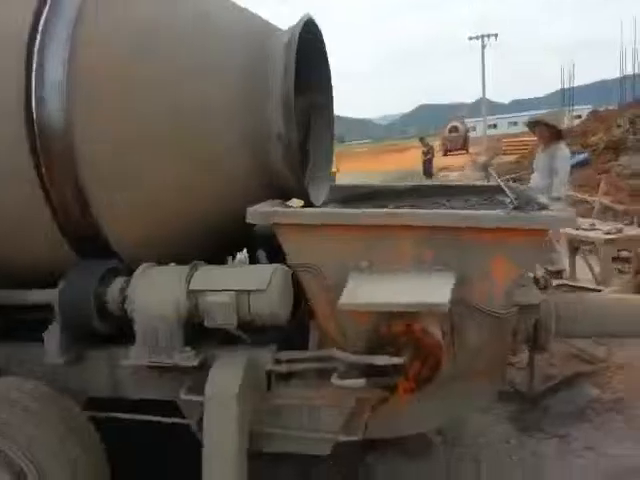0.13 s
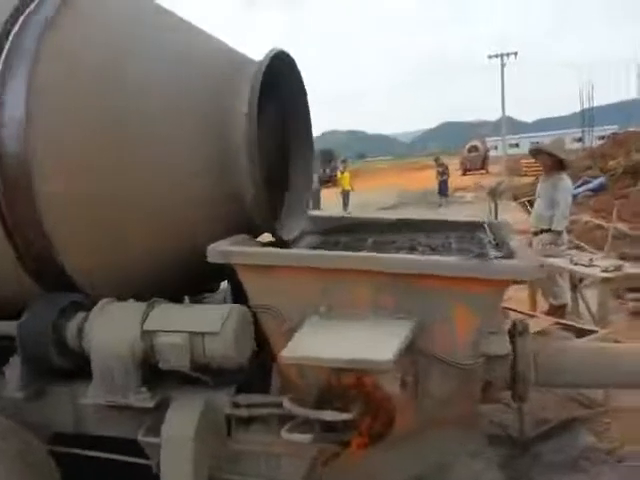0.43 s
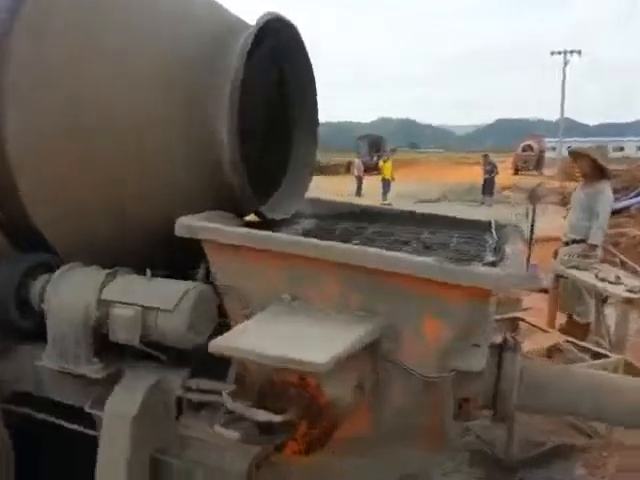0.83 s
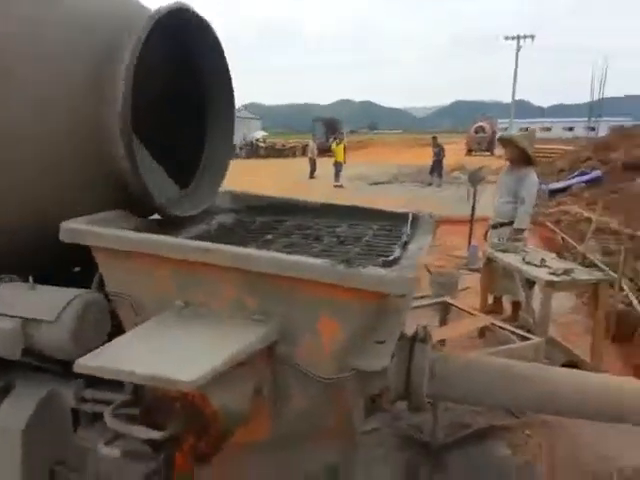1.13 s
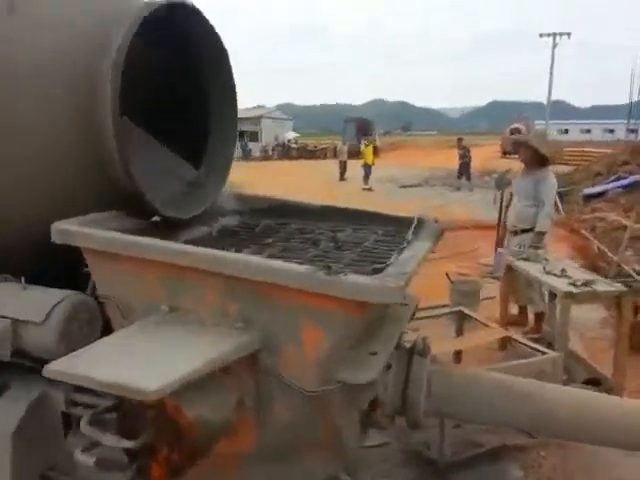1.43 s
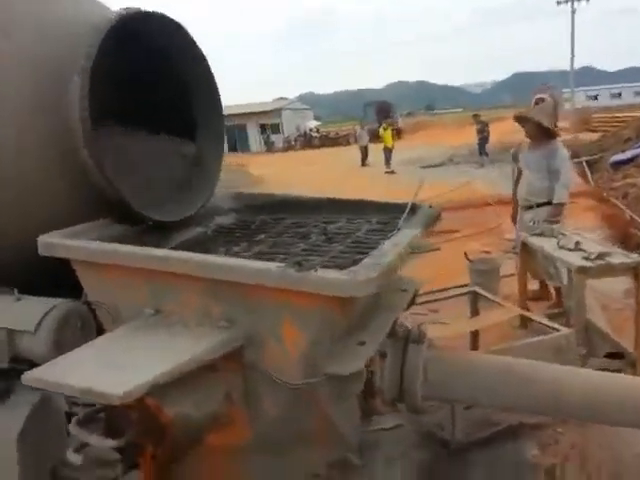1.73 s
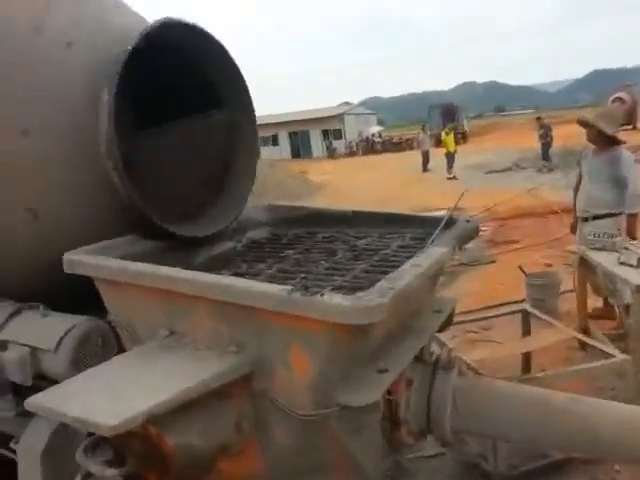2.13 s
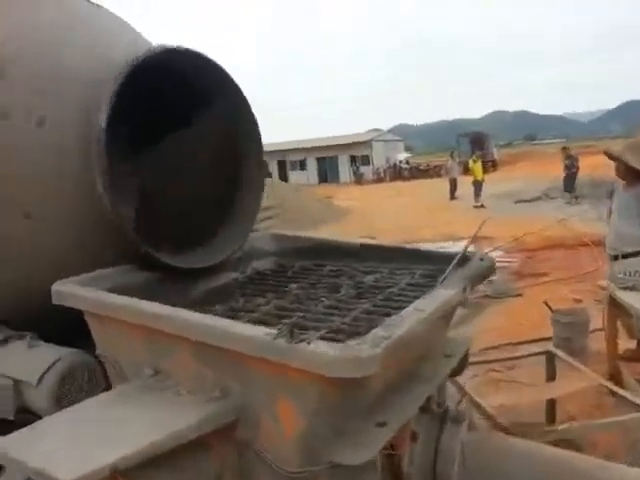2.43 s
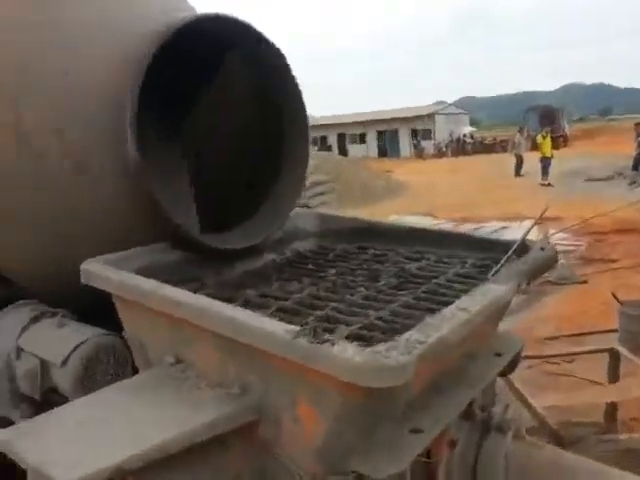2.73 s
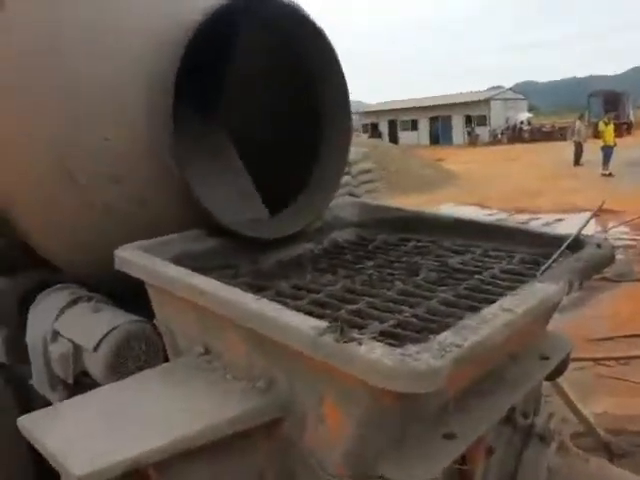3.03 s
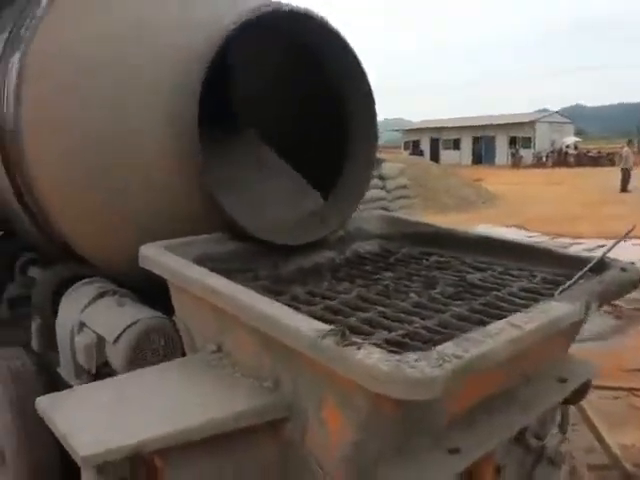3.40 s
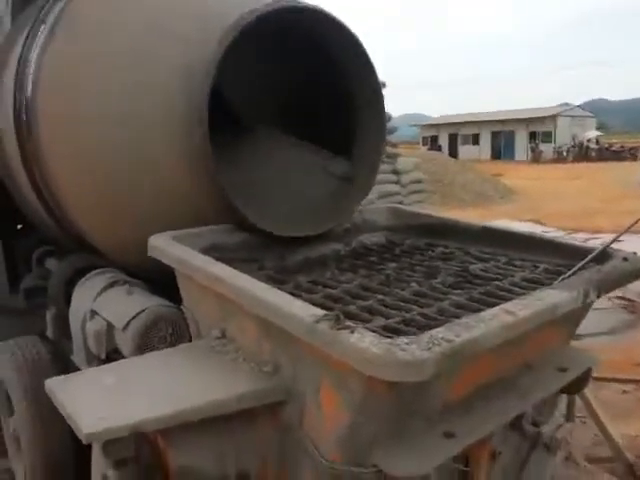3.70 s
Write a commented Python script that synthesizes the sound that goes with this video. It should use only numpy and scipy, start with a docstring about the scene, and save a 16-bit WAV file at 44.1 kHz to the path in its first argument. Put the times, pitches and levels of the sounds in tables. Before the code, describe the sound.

A concrete mixer and pump run with a rattling roar, gravel hiss and gear whine.

```python
"""A rattling roar, a hiss and a whine start at once: a concrete mixer and pump running outdoors.
Steel parts shake to make the roar, wet gravel hisses in the turning drum, a gear whines, a shaft hums.
As the microphone moves toward the hopper, a low drone grows. Then the mix is heard churning there,
scraping the steel walls and dropping in lumps."""
import sys
import numpy as np
from scipy import signal
from scipy.fft import rfft, irfft
from scipy.io import wavfile
from scipy.ndimage import uniform_filter1d

SR = 44100
rng = np.random.default_rng(int(sys.argv[2]) if len(sys.argv) > 2 else 0)


def pcm_store(signal):
    """Save signal as 16-bit PCM."""
    levels = np.round(np.clip(np.atleast_2d(signal), -1, 1) * 32767)
    wavfile.write(sys.argv[1], SR, levels.astype(np.int16).T)


N = 170226


def undb(db):
    """Turn decibels into a number to multiply a sound by."""
    return 10 ** (np.asarray(db) / 20)


def unit(x):
    """Scale a signal so that its typical swing is 1."""
    return x / np.std(x)


def curve(rows):
    """A volume that glides through (time_s, level_db) points."""
    return undb(np.interp(np.arange(N) / SR, *np.array(rows).T))


def bump(middle_s, half_width_s):
    """A smooth rise and fall around one moment."""
    return np.exp(-2 * ((np.arange(N) / SR - middle_s) / half_width_s) ** 2)


def swelling(levels, swells):
    """A gliding volume with the power of short swells added to it."""
    extra_power = sum((undb(db) * bump(at, half_width)) ** 2 for at, half_width, db in swells)
    return np.sqrt(curve(levels) ** 2 + extra_power)


def strike(start_s, decay_s):
    """A volume that jumps up and dies away."""
    age = np.arange(N) / SR - start_s
    return (age > 0) * np.exp(-np.abs(age) / decay_s)


def walk(per_s):
    """A smooth random wobble of typical size 1, with per_s new turns a second."""
    hold = int(SR / per_s)
    steps = np.repeat(rng.standard_normal(N)[:N // hold + 1], hold)
    return unit(uniform_filter1d(uniform_filter1d(steps, hold), hold)[:N])


def colour(x, points):
    """Set the balance of low and high pitches from (pitch_hz, relative_db) points."""
    hz, db = np.array(points).T
    freqs = np.maximum(np.fft.rfftfreq(N, 1 / SR), 1)
    gain = undb(np.interp(np.log(freqs), np.log(hz), db))
    return unit(irfft(rfft(x) * gain, N))


def resonance(pitch_hz, width_hz):
    """Something shaken at random rings near one pitch; a smaller width gives a purer note."""
    offset = (np.fft.rfftfreq(N, 1 / SR) - pitch_hz) / (width_hz / 2)
    return unit(irfft(rfft(rng.standard_normal(N)) / (1 + 1j * offset) ** 2, N))


def knocks(per_s, spread_db, ring_s):
    """Many tiny hits of uneven strength, each a fading burst of noise."""
    hits = (rng.random(N) < per_s / SR) * rng.choice([-1, 1], N)
    strength = undb(spread_db * np.minimum(rng.exponential(size=N), 4))
    energy = signal.lfilter([1], [1, -np.exp(-2 / (ring_s * SR))], (hits * strength) ** 2)
    return unit(np.sqrt(energy) * rng.standard_normal(N))


def flicker(x, depth_db, per_s):
    """Each octave of the sound gets louder and softer on its own."""
    octave = np.log2(np.clip(np.fft.rfftfreq(N, 1 / SR), 125, 8000) / 125)
    spectrum = rfft(x)
    bands = (irfft(spectrum * np.maximum(1 - abs(octave - k), 0), N) for k in range(7))
    return unit(sum(band * undb(depth_db * walk(per_s)) for band in bands))


def echoes(x, count=12, total_db=-14, longest_s=0.016):
    """Sound bounces off the drum, hopper and ground and arrives again a little later."""
    samples, mixed = np.arange(N), x
    for delay, flip in rng.random((count, 2)):
        delayed = np.interp(samples - longest_s * delay * SR, samples, x)
        mixed = mixed + np.sign(flip - .5) * undb(total_db) / np.sqrt(count) * delayed
    return unit(mixed)


def nearness(halfway_s=1.6, ease_s=0.97):
    """Where the microphone is: 0 beside the drum, 1 at the hopper."""
    return .5 + .5 * np.tanh((np.arange(N) / SR - halfway_s) / ease_s)


def drone():
    """A low wavering tone, loudest close to the hopper."""
    # loudness of the drone: time_s, level_db
    levels = [(0, -55.5), (1.9, -40), (2.15, -34.5), (2.5, -34), (3.0, -36), (3.85, -36)]
    pitch_hz = 80.2 * (1 + 0.021 * walk(per_s=4))
    tone = np.sqrt(2) * np.sin(2 * np.pi * np.cumsum(pitch_hz) / SR)
    return tone * curve(levels) * undb(-0.5 * walk(per_s=10))


def shaft_hum(shaft_angle):
    """The shaft hums at multiples of its turning speed, deeper and rougher toward the hopper."""
    # the weaker hum tones: cycles_per_turn, drum_level_db, hopper_level_db
    tones = [(2, -45, -50), (5, -52.5, -38), (7, -42, -38.5), (8, -46, -36), (9, -34, -36),
             (18, -37.5, -41.5), (24, -49, -38.5), (36, -47.5, -42.5)]
    # loudness of the strongest hum tone: time_s, level_db
    strongest_levels = [(.08, -27), (.18, -30.5), (.3, -30), (.38, -43), (.53, -28), (.58, -35),
                        (.65, -26.5), (.76, -27.5), (.86, -37), (.94, -28), (1.05, -32), (1.2, -36.5),
                        (1.26, -30), (1.32, -36), (1.42, -27.5), (1.6, -28.5), (1.9, -35), (2.2, -30.5),
                        (2.5, -34), (2.8, -31), (3.3, -33), (3.43, -28), (3.63, -36), (3.85, -33)]
    waver_db, shake_db = 2.0, 2.0
    near = nearness()
    hum = curve(strongest_levels) * np.sin(16 * shaft_angle)
    for cycles, drum_db, hopper_db in tones:
        level_db = drum_db + (hopper_db - drum_db) * near + waver_db * walk(per_s=6.1)
        hum += undb(level_db) * np.sin(cycles * shaft_angle + 2 * np.pi * rng.random())
    return np.sqrt(2) * hum * undb(shake_db * near * walk(per_s=30))


def gear_whine(shaft_angle):
    """Gear teeth meet fast enough to make a note, which swells once with each turn of the shaft."""
    # loudness of the whine: time_s, level_db
    levels = [(.08, -27), (.14, -18.5), (.29, -19), (.335, -27), (.39, -22), (.47, -24), (.55, -21),
              (.6, -35), (.66, -24), (.74, -31), (.78, -25.5), (.88, -24), (.95, -19), (1.03, -19),
              (1.08, -25), (1.22, -20.5), (1.35, -22.5), (1.49, -29.5), (1.55, -23.5), (1.63, -23),
              (1.7, -19), (1.76, -27), (1.8, -22), (1.84, -32), (1.9, -24.5), (2.01, -20.5), (2.1, -29),
              (2.18, -20.5), (2.26, -19.5), (2.29, -32), (2.37, -30), (2.42, -20.5), (2.53, -23),
              (2.58, -33), (2.69, -28), (2.73, -21), (2.81, -22), (2.87, -34), (2.95, -24), (3.0, -28),
              (3.06, -20.5), (3.11, -33), (3.17, -19), (3.27, -21), (3.38, -33), (3.52, -26.5), (3.6, -29),
              (3.75, -24), (3.85, -35)]
    # rough tones on and above the note: pitch_multiple, level_db, width_hz
    overtones = [(1, -39, 36), (2, -33.5, 40), (3, -34, 36)]
    tooth_hz, hopper_fade_db = 544.3, -1
    pitch_hz = tooth_hz * (1 + 0.001 * walk(per_s=5) + 0.0015 * walk(per_s=60))
    swing = (1 + 0.11 * np.sin(shaft_angle)) * undb(0.5 * walk(per_s=35))
    tone = np.sqrt(2) * np.sin(2 * np.pi * np.cumsum(pitch_hz) / SR)
    rough = sum(undb(db) * resonance(multiple * tooth_hz, width) for multiple, db, width in overtones)
    return tone * curve(levels) * swing + rough * undb(hopper_fade_db * nearness())


def hopper():
    """The mix churns, scrapes, rings the steel walls and drops in lumps; stones tick on the grate."""
    # tone of the churning: pitch_hz, relative_db
    churn_tone = [(130, -15), (300, -1), (500, -2.5), (800, 1), (1150, -4), (1400, 0.5), (1750, -4),
                  (2080, -2.5), (2350, -6), (2700, 0), (3000, -11), (3400, -3.5), (3900, -23.5),
                  (8000, -32)]
    # loudness of the churning: time_s, level_db
    churn_levels = [(0, -36), (2.5, -51.5), (2.84, -26), (2.93, -21), (3.12, -21), (3.3, -22),
                    (3.85, -20.5)]
    # the mix scraping on steel: middle_s, half_width_s, level_db
    scrapes = [(.105, .025, -23), (.195, .02, -23), (.665, .025, -25), (1.265, .02, -24), (2.095, .02, -24),
               (2.285, .03, -24), (2.683, .016, -16.5), (2.728, .02, -21), (2.945, .02, -23),
               (3.085, .04, -23), (3.468, .025, -23)]
    # notes of the walls, set against the churning: pitch_hz, width_hz, relative_db
    wall_notes = [(781, 21, -13.5), (882, 49, -15), (1032, 40, -17), (1110, 28, -14), (1399, 49, -15.5),
                  (2075, 28, -11)]
    # falling lumps: start_s, level_db
    lumps = [(2.67, -19), (2.729, -17), (2.778, -22), (2.815, -18.5), (3.412, -17)]
    # stones hitting the grate: start_s, level_db
    stones = [(.326, -16), (.345, -16), (.363, -11), (.755, -15), (.894, -17), (2.347, -12), (2.834, -12)]
    walls = sum(undb(db) * resonance(hz, width) for hz, width, db in wall_notes)
    thuds = resonance(pitch_hz=213, width_hz=110)
    thuds *= sum(undb(db) * strike(at, decay_s=0.012) for at, db in lumps)
    ticks = resonance(pitch_hz=5600, width_hz=6500)
    ticks *= sum(undb(db) * strike(at, decay_s=0.004) for at, db in stones)
    churn = colour(knocks(per_s=2300, spread_db=2.5, ring_s=0.0015), churn_tone)
    return (churn + walls) * swelling(churn_levels, scrapes) + thuds + ticks


def gravel_hiss():
    """Wet gravel rubs and taps against the drum, and now and then slides."""
    # tone of the hiss: pitch_hz, relative_db
    hiss_tone = [(500, -29.5), (2000, -5), (3000, -5), (3700, -6), (4400, -0.5), (5000, -2), (5800, -3.5),
                 (6400, -1.5), (6900, 1.5), (7500, 3.5), (8000, -12)]
    # loudness of the hiss: time_s, level_db
    levels = [(.08, -19.5), (.55, -20), (.68, -18), (.8, -20.5), (.9, -19.5), (1.55, -18.5), (2.1, -20),
              (2.6, -19.5), (3.2, -20), (3.68, -18), (3.85, -20.5)]
    # short slides of gravel: middle_s, half_width_s, level_db
    slides = [(.358, .025, -22), (.545, .012, -24), (.65, .015, -23), (.703, .02, -20), (.765, .018, -24),
              (.875, .025, -23), (1.52, .025, -25), (2.565, .015, -25), (2.83, .013, -24)]
    rubbing = rng.standard_normal(N)
    grit = undb(-1) * knocks(per_s=2400, spread_db=2.5, ring_s=0.001)
    hiss = colour(echoes(rubbing + grit), hiss_tone)
    return flicker(hiss, depth_db=0.87, per_s=45) * swelling(levels, slides)


def machinery_roar(shaft_angle):
    """Steel parts roar and rattle, throbbing with the shaft, while the machine's casings ring."""
    # tone of the roar: pitch_hz, relative_db
    roar_tone = [(20, -9.5), (38, -11.5), (60, -7), (100, -1.5), (170, -2.5), (280, 0.5), (450, 1.5),
                 (750, -0.5), (1300, -0.5), (1900, -1.5), (2500, -5.5), (3200, -12.5), (5000, -19),
                 (8000, -31.5)]
    # loudness of the roar: time_s, level_db
    levels = [(.08, -19.5), (.25, -20.5), (.55, -21), (.78, -21.5), (.95, -19), (1.6, -20.5), (2.0, -20),
              (2.26, -18.5), (2.5, -20), (2.82, -19.5), (2.95, -19), (3.12, -21), (3.35, -21), (3.85, -27)]
    # notes of the casings: pitch_hz, width_hz, level_db
    casing_notes = [(202, 38, -37.5), (340.6, 2.7, -41), (355.6, 6, -39), (522, 4.1, -34.5),
                    (2010, 250, -41.5)]
    rush = rng.standard_normal(N)
    rattle = undb(-9) * knocks(per_s=430, spread_db=2, ring_s=0.0026)
    throb = 1 + 0.055 * np.sin(shaft_angle)
    roar = colour(echoes((rush + rattle) * throb), roar_tone)
    roar = flicker(roar, depth_db=1.12, per_s=35)
    ringing = sum(undb(db) * resonance(hz, width) for hz, width, db in casing_notes)
    return roar * curve(levels) * undb(0.27 * walk(per_s=25)) + ringing


def scene():
    """All parts of the machine at one microphone; one shaft ties hum, whine and roar together."""
    turns_per_s = 24.89 * (1 + 0.002 * walk(per_s=2.96))
    shaft_angle = 2 * np.pi * np.cumsum(turns_per_s) / SR
    machine = shaft_hum(shaft_angle) + gear_whine(shaft_angle) + machinery_roar(shaft_angle)
    return (machine + gravel_hiss() + hopper() + drone())[None]


def record(dry):
    """The sound starts abruptly, dips briefly a few times and lacks the highest treble."""
    # brief drops in loudness: middle_s, half_width_s, change_db
    dips = [(.245, .02, -3), (.379, .01, -4), (.598, .022, -3.5), (.81, .025, -2), (2.14, .018, -3),
            (2.702, .014, -8), (2.851, .018, -5.5)]
    start_s, fade_in_s, top_hz = 0.0762, 0.0094, 7680
    opening = np.clip((np.arange(N) / SR - start_s) / fade_in_s, 0, 1)
    dipping = undb(sum(db * bump(at, half_width) for at, half_width, db in dips))
    treble_cut = signal.ellip(14, .1, 80, top_hz, fs=SR, output="sos")
    return signal.sosfilt(treble_cut, dry * opening * dipping)


dry = scene()
out = record(dry)
pcm_store(out)
```